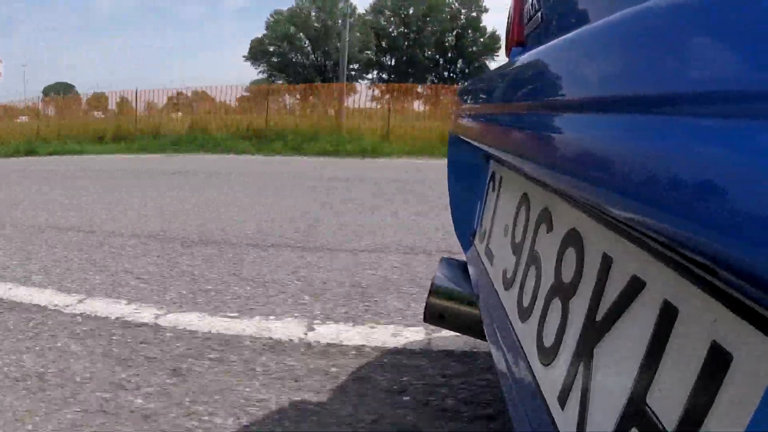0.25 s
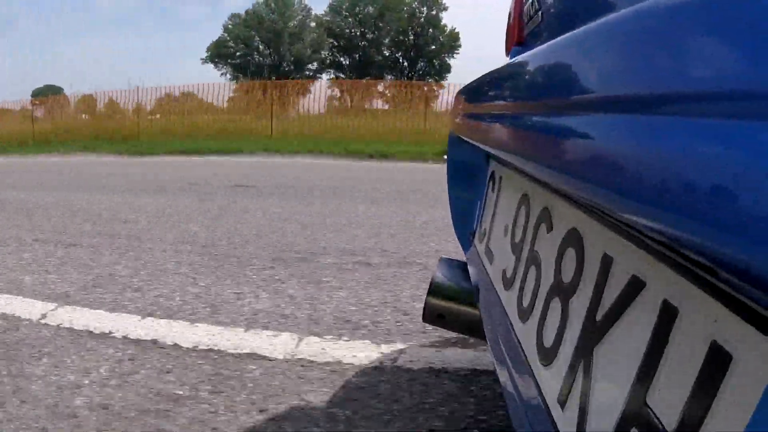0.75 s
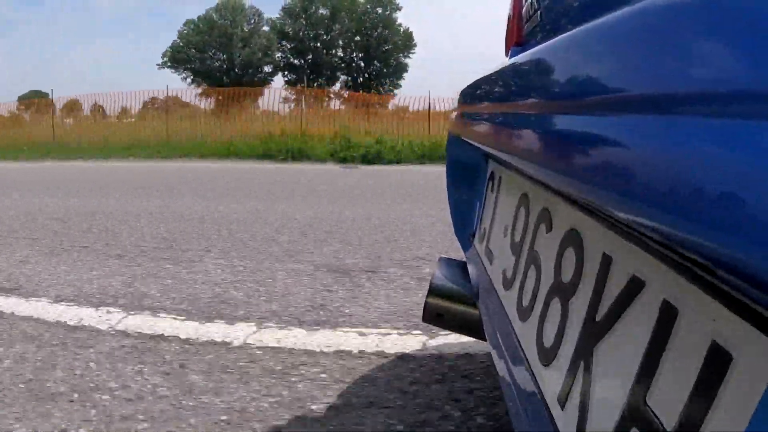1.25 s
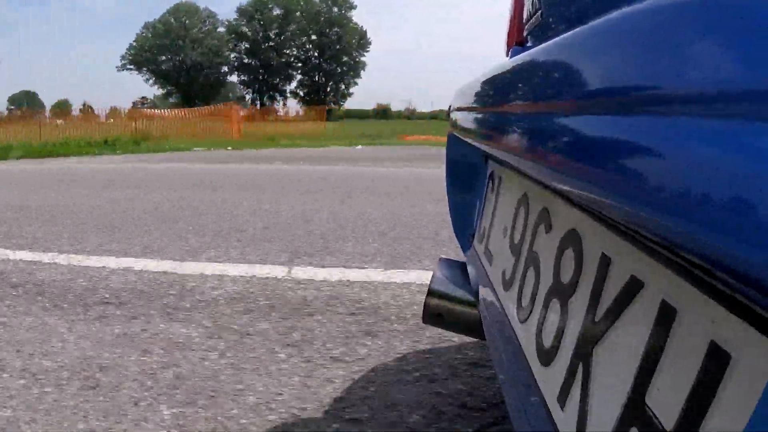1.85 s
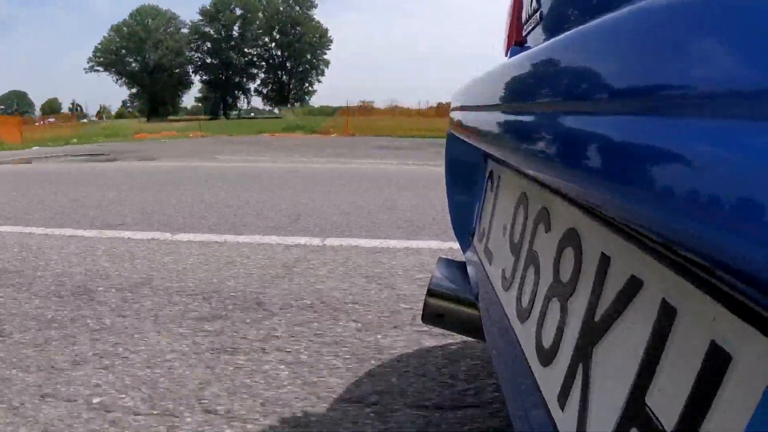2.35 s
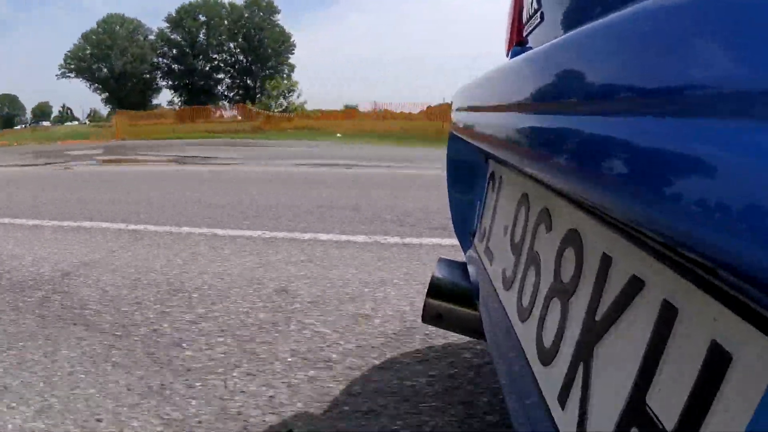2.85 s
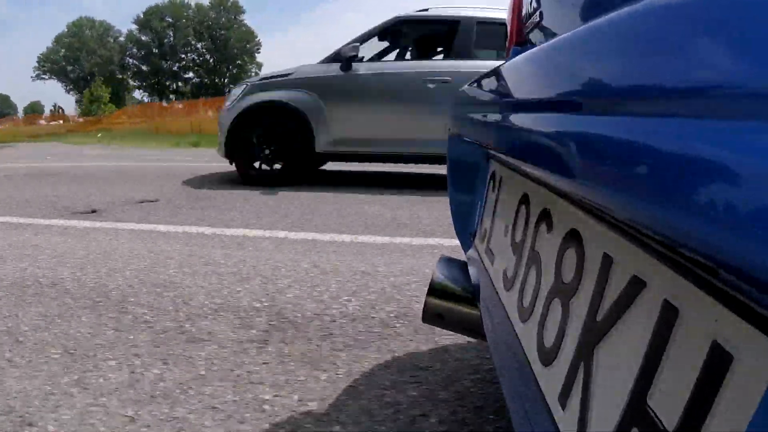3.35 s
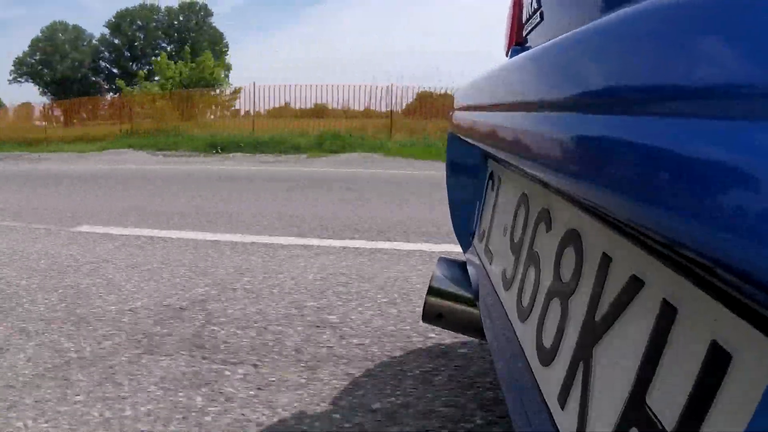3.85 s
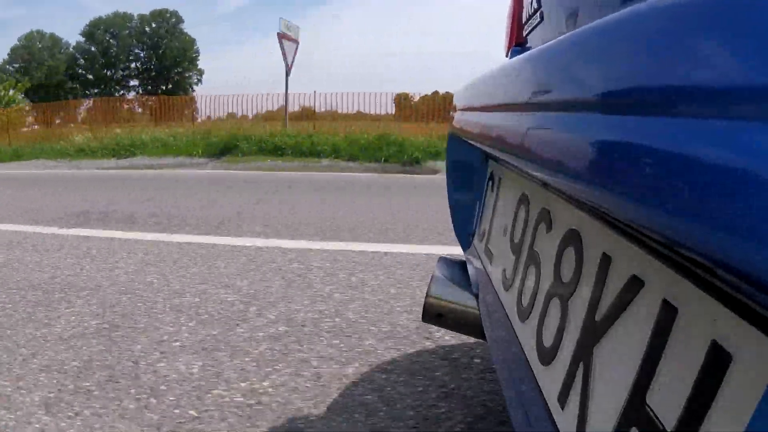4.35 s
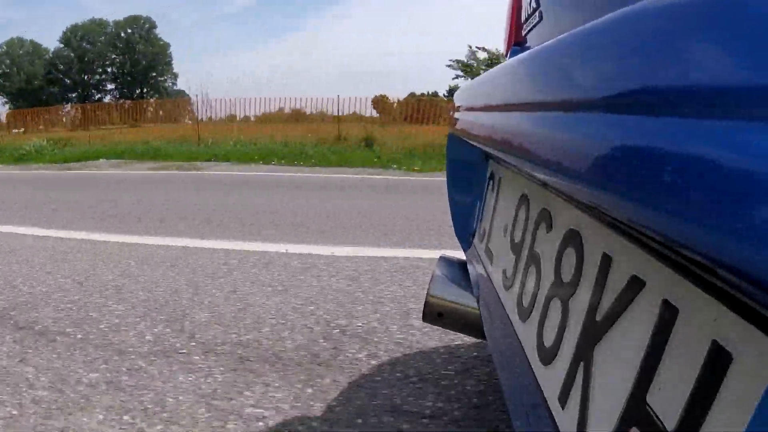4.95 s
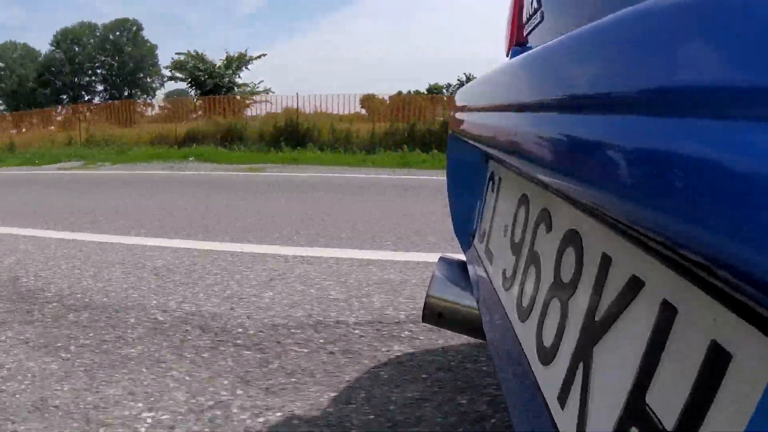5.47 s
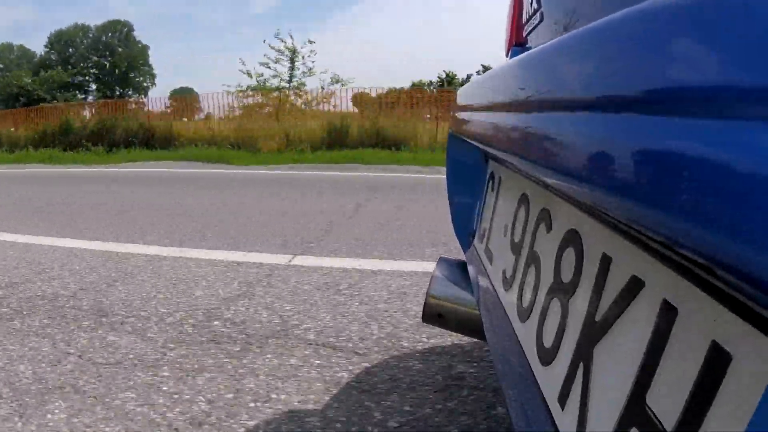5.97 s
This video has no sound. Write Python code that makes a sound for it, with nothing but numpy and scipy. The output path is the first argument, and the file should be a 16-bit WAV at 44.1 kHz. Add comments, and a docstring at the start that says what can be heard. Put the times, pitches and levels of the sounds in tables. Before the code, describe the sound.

Right beside a moving car's tailpipe outdoors, the exhaust barks and rises slightly under load, then the throttle lifts and a tiny metallic clink sounds. A deep overrun drone swells, broken by dense sharp bangs and crackles in two volleys. A few small throttle blips and muffled thuds follow, then a steady drone slowly falls in pitch. Tyres roar and wind buffets the dull, housed microphone.

```python
"""Beside the tailpipe of a four-cylinder car that pulls, lifts off and coasts.
The exhaust drones on low orders of the engine cycle (sines) and barks under load (a shock per firing).
Unburnt fuel bangs in the pipe on lift-off: shocks, ringing noise, thumps and cracks. A metal part clinks once.
Tyres roar and wind buffets the microphone (coloured noise).
The level of engine, tyres and wind is turned down abruptly among the bangs and creeps back."""
import sys
import numpy as np
from scipy import signal
from scipy.fft import rfft, irfft
from scipy.io import wavfile
from scipy.ndimage import uniform_filter1d

SR = 44100
rng = np.random.default_rng(int(sys.argv[2]) if len(sys.argv) > 2 else 0)


def makeup_ratio(level_db):
    """Linear amplitude ratio for a level in decibels (20 dB per factor of ten)."""
    decades = np.asarray(level_db, float) / 20
    return 10 ** decades


def bounce(signal):
    """Save signal as a 16-bit WAV file at the path given by the first command-line argument."""
    frames = np.transpose(np.atleast_2d(signal))
    limited = np.clip(frames, -1, 1)
    pcm = np.round(limited * 32767).astype(np.int16)
    wavfile.write(sys.argv[1], SR, pcm)


N = 273861


def rms_one(x):
    """Scale to rms 1."""
    return x / np.sqrt(np.mean(x ** 2) + 1e-20)


def in_time(rows):
    """Columns of a curve table, interpolated at every sample."""
    s, *columns = np.transpose(rows)
    return [np.interp(np.arange(N) / SR, s, c) for c in columns]


def drift(rate_hz):
    """Random wander of rms 1: noise through two equal one-pole low-passes."""
    r = np.exp(-2 * np.pi * rate_hz / SR)
    noise = rng.standard_normal(N + SR)
    return rms_one(signal.lfilter([1], [1, -2 * r, r * r], noise)[SR:])


def cut(x, hz, kind, order=2):
    """Butterworth high- or low-pass."""
    return signal.sosfilt(signal.butter(order, hz, kind, fs=SR, output="sos"), x)


def resonance(x, hz, width_hz):
    """Two-pole band-pass with gain 1 on top."""
    r = np.exp(-np.pi * width_hz / SR)
    zeros = np.array([1, 0, -1]) * (1 - r * r) / 2
    poles = [1, -2 * r * np.cos(2 * np.pi * hz / SR), r * r]
    return signal.lfilter(zeros, poles, x + 1e-18)


def fade(clicks, t60_s):
    """Each click starts an envelope that falls 60 dB in t60_s."""
    return signal.lfilter([1], [1, -makeup_ratio(-60 / (t60_s * SR))], clicks + 1e-18)


def coloured(spectrum):
    """Noise with the given spectrum; rms 1."""
    hz, db = np.transpose(spectrum)
    bins = np.fft.rfftfreq(N, 1 / SR) + 1
    shape_db = np.interp(np.log(bins), np.log(hz), db, left=-90, right=-140)
    return rms_one(irfft(rfft(rng.standard_normal(N)) * makeup_ratio(shape_db), N))


# Engine speed. Each row: time in seconds, four-stroke cycles per second.
ENGINE_SPEED = [(0, 36), (.2, 37.45), (.5, 39.5), (.64, 40.25), (.74, 40.3), (.82, 39.75), (.92, 40.2),
                (1.05, 40.7), (1.17, 40.5), (1.3, 39.9), (1.45, 40.2), (1.6, 39.8), (2.45, 38), (3.7, 36),
                (3.9, 36.3), (4.05, 35.8), (4.65, 35.05), (4.9, 34.5), (5.5, 32.65), (5.8, 31.6),
                (6.21, 30.5)]


def engine_speed():
    """Four-stroke cycles per second at every sample."""
    return in_time(ENGINE_SPEED)[0]


# Throttle openings. Each row: opens in seconds, shuts in seconds, bark level in dB, fall in dB per second.
THROTTLE_OPENINGS = [(-.1, 0.714, -19.5, 38.5), (.9, 1.219, -33.5, 400), (3.413, 3.532, -34.5, 607),
                     (3.58, 3.615, -33.5, 1503), (3.653, 3.671, -32.5, 797), (3.828, 4.098, -31, 909)]
OPENS_DB_PER_S = 1507


def throttle():
    """Bark level in dB: quick rise, hold, steady fall for each opening; the loudest counts."""
    t = np.arange(N) / SR
    openings_db = []
    for opens_s, shuts_s, level_db, fall_db_per_s in THROTTLE_OPENINGS:
        rise_db = OPENS_DB_PER_S * np.maximum(opens_s - t, 0)
        fall_db = fall_db_per_s * np.maximum(t - shuts_s, 0)
        openings_db.append(level_db - rise_db - fall_db)
    return np.max(openings_db, axis=0)


# Overrun pumping. Each row: time in seconds, level in dB, unevenness of the firings 0-1 (limited to 0.95).
OVERRUN_CURVE = [(0, -35, 0.16), (.7, -40, 0), (1.2, -36, 0.2), (1.25, -2.5, 0.3), (1.45, -0.5, .2),
                 (1.68, 0, 0.1), (1.76, -1.5, 0.8), (2.26, -1.5, 0.8), (2.38, -0.5, .3),
                 (2.565, -0.5, 0.08), (2.575, -6, .5), (2.7, -4.5, 0.4), (2.85, -3, 1), (3.3, -4, .9),
                 (3.56, -11, 0.9), (3.75, -6, 0.7), (3.83, -9, 0.2), (4.09, -7.5, 0.2), (4.15, -9.5, 0.7),
                 (4.35, -10, 0.4), (4.5, -6, .6), (4.62, -2, 0.01), (5.1, -2, .05), (6.21, -1, 0.2)]


def overrun():
    """Overrun level, common to every order, and unevenness of the firings."""
    overrun_db, uneven = in_time(OVERRUN_CURVE)
    return overrun_db, np.clip(uneven, 0, .95)


# What the silencer lets through on the overrun. Each row: frequency in Hz, level in dB.
SILENCER_RESPONSE = [(30, -40), (70, -49), (92, -19), (105, -17), (120, -12.5), (130, -10.5), (145, -16),
                     (160, -14.5), (175, -18), (195, -43), (215, -32.5), (240, -25), (262, -34), (320, -32),
                     (350, -36.5), (400, -45), (440, -42.5)]
# Drone orders, also played by drone(). Each row: order of the engine cycle, phase in degrees,
# level in dB rms at full bark, share of the bark's fall that it follows, overrun level in dB re silencer.
DRONE_ORDERS = [(1, -5, -37.5, .75, 2), (2, -3.5, -44, .75, -5.5), (3, -135, -25, 1, -2),
                (4, -8.5, -10.5, 0.91, 1.5), (5, -32, -28, 0.53, -2), (6, -110, -37, 0.1, 1),
                (7, 164.5, -27.5, .7, -4), (8, -86, -17, 0.56, -4.5), (9, 6.5, -32, 0.9, -2),
                (10, 54, -45, 0.67, 3), (11, 10.5, -45.5, 0.28, -11), (14, 2.5, -54, .75, 0.5)]
FULL_BARK_DB, LIT_DB = -18, -39
RAGGED_DB = 12   # ragged firing builds no tone


def order_levels(speed, bark_db, overrun_db, uneven):
    """Level of each drone order: fired share plus pumped share, as powers."""
    hz, passed_db = np.transpose(SILENCER_RESPONSE)
    out_db = 3.0 * np.minimum(bark_db - LIT_DB, 0) - RAGGED_DB * uneven ** 2   # below LIT_DB the fire is out
    levels = []
    for order, _, full_db, share, pumped_db in DRONE_ORDERS:
        pumped = makeup_ratio(overrun_db + pumped_db + np.interp(order * speed, hz, passed_db))
        fired = makeup_ratio(full_db + share * (bark_db - FULL_BARK_DB) + out_db)
        levels.append(np.hypot(pumped, fired))
    return levels


def drone(cycles, levels, uneven):
    """Low orders of the engine cycle; uneven firings smear each line into a wavering band."""
    wavers = [drift(32.0) for k in range(4)]
    out = np.zeros(N)
    for i, (row, level) in enumerate(zip(DRONE_ORDERS, levels)):
        angle = 2 * np.pi * row[0] * cycles + np.radians(row[1])
        in_phase = np.sqrt(2 * (1 - uneven ** 2)) + uneven * wavers[i % 4]
        quadrature = uneven * wavers[(i + 1) % 4]
        out += level * (in_phase * np.cos(angle) + quadrature * np.sin(angle))
    return out


# Tailpipe and bodywork resonances. Each row: frequency in Hz, width in Hz, gain in dB.
PIPE_MODES = [(316, 120, -20), (644, 150, -0.5), (1070, 147, 4.5), (1122, 246, -1), (1880, 440, -7),
              (2920, 530, -31.5), (6040, 850, -33)]


def pipe(x):
    """Resonances in parallel, signs alternating."""
    out = np.zeros(N)
    for k, (hz, width_hz, gain_db) in enumerate(PIPE_MODES):
        out += (-1) ** k * makeup_ratio(gain_db) * resonance(x, hz, width_hz)
    return out


def shock(clicks, top_hz):
    """Steep pressure front, quick decay, repeated duller by the tip of the pipe."""
    tip_echo_s, tip_echo_db = .00103, -5.5   # round trip
    lag = round(tip_echo_s * SR)
    front = cut(cut(fade(clicks, .0055), top_hz, "low", order=3), 200, "high", order=1)
    echo = makeup_ratio(tip_echo_db) * np.array([1, 2, 3, 2, 1]) / 9
    return signal.lfilter([1], np.r_[1, np.zeros(lag - 3), -echo], front)


# Uneven filling of the four cylinders, heard most at light throttle.
# Each entry: relative level, times 4.47 dB at light throttle and 3.47 dB under load.
CYLINDER_FILLING = [-1, -0.5, -1.5, -0.5]
LONG_RUNNER_S = 0.00032   # two of the four cylinders have a longer way to the pipe


def bark(cycles, bark_db, uneven):
    """A small shock per firing and a puff of hiss behind it; the low orders belong to the drone."""
    load = np.clip((bark_db + 36) / 15, 0, 1)   # light throttle gives rounder, less even pulses
    fired = np.flatnonzero(np.diff(np.floor(4 * cycles + 0.055))) + 1
    cylinder = np.arange(len(fired)) % 4
    late = np.round((cylinder >= 2) * LONG_RUNNER_S * SR).astype(int)
    at = np.minimum(fired + late, N - 1)
    scatter_db = rng.standard_normal(len(at)) * (.4 + 4 * uneven[at])
    filling_db = np.array(CYLINDER_FILLING)[cylinder] * (4.47 - load[at])
    pulses = np.zeros(N)
    pulses[at] = makeup_ratio(scatter_db + filling_db)

    front = shock(pulses, 1900.0)
    mellow = makeup_ratio(6.5) * resonance(front, 1008.0, 460.0)
    mellow += makeup_ratio(7.0) * resonance(front, 690.0, 100.0)
    mellow += makeup_ratio(2.5) * resonance(front, 470.0, 90.0)
    sharp = front + makeup_ratio(-6.5) * resonance(front, 1700.0, 500.0)
    sharp += makeup_ratio(5.5) * resonance(front, 2200.0, 990.0)
    sharp += makeup_ratio(8.0) * resonance(front, 2370.0, 120.0)
    sharp += makeup_ratio(4.0) * resonance(front, 3050.0, 350.0)

    puffs = fade(pulses ** 3, 0.019) * rng.standard_normal(N)
    whistle = resonance(resonance(puffs, 6060.0, 1300.0), 6060.0, 1300.0)
    hiss = makeup_ratio(-12.0) * whistle
    hiss += makeup_ratio(-30.5) * cut(puffs, 9500.0, "high")
    hiss += makeup_ratio(-17.0) * resonance(puffs, 3850.0, 500.0)
    hiss += makeup_ratio(-14) * pipe(puffs)

    mixed = cut(mellow + load * (sharp + hiss), 390.0, "high")
    return makeup_ratio(bark_db) * mixed / np.std(cut(mellow + sharp, 270.0, "high"))


def chuff(cycles, speed, overrun_db):
    """On the overrun one cylinder spits a dull pulse once a cycle, fainter as the engine slows."""
    level_db, scatter_db, db_per_speed, reference_speed = -18.5, 3, 2.5, 40   # re overrun; speeds in cycles/s
    at = np.flatnonzero(np.diff(np.floor(cycles + .2))) + 1
    pulse_db = overrun_db[at] + level_db + db_per_speed * (speed[at] - reference_speed)
    pulses = np.zeros(N)
    pulses[at] = makeup_ratio(pulse_db + scatter_db * rng.standard_normal(len(at)))
    return cut(shock(pulses, 1200.0), 380.0, "high")


# Muffled afterburns. Each row: time in seconds, relative level in dB.
MUFFLED_BURNS = [(3.673, -12.5), (4.124, -11.5), (4.238, -24.5), (4.322, -23.5), (4.404, -10.5),
                 (4.437, -9), (4.464, -11.5), (4.489, -7.5)]
# Bangs, also read by falter().
# Each row: time in seconds, relative level in dB, thump in dB re level, crack in dB re level.
PIPE_BANGS = [(1.6707, -27.5, -6, -14), (1.7201, -3, 0.5, -19), (1.7284, -3, -6.5, -25),
              (1.7497, -21.5, 3.5, -15.5), (1.812, -8.5, 8, -20), (1.8824, -1, -24.5, -19),
              (1.895, -15.5, 13.5, -54.5), (1.899, -9, -10.5, -17), (1.9678, -13.5, 4, -17),
              (2.051, -14, -1, -28), (2.0533, 0, 0.5, -19.5), (2.0586, -7, 1, -32.5),
              (2.1471, -3, -10.5, -21), (2.2185, -2.5, -2.5, -20), (2.235, -6.5, -3.5, -19),
              (2.2566, -16, 9.5, -16.5), (2.625, -2.5, -11, -14.5), (2.6311, -5.5, -30.5, -20.5),
              (2.7076, -23.5, 2, -23), (2.772, -25, 4, -18), (2.8048, -11.5, -20, -21.5),
              (2.8706, -11, -6, -19), (2.891, -20, -14, -23.5), (2.9051, -14, -5, -30),
              (2.9652, -11, -5.5, -20), (3.032, -8.5, -4.5, -22), (3.035, -26, 10, -34.5),
              (3.0372, -18.5, 9.5, -20), (3.106, -25.5, -17, -21.5), (3.1123, -9, -2, -26),
              (3.1277, -6, -19.5, -20), (3.1983, -17, 6, -21), (3.239, -36, -12, -13),
              (3.2913, -12, 1, -15), (3.2927, 3, -13, -22.5), (3.3694, -20, -6, -26),
              (3.768, -7, 3.5, -21.5)]


def bangs():
    """A shock with its echoes, turbulence ringing the pipe, a low thump and a bright crack."""
    s, level_db, thump_db, crack_db = np.transpose(PIPE_BANGS)
    at = np.round(s * SR).astype(int)
    body, thump, crack, muffled = np.zeros((4, N))
    body[at] = makeup_ratio(level_db)
    thump[at] = makeup_ratio(level_db + thump_db)
    crack[at] = makeup_ratio(level_db + crack_db)
    for burn_s, burn_db in MUFFLED_BURNS:
        muffled[round(burn_s * SR)] = makeup_ratio(burn_db)
    noise = rng.standard_normal((3, N))

    burst = makeup_ratio(-18.5) * body
    burst += makeup_ratio(5.0) * fade(body, 0.032) * noise[0]
    burst += makeup_ratio(-15.0) * fade(body, 0.075) * noise[1]
    low = makeup_ratio(34.0) * cut(resonance(thump, 290.0, 140.0), 420.0, "low", order=3)
    soft = makeup_ratio(42.5) * resonance(resonance(muffled, 160.0, 120.0), 160.0, 120.0)   # burnt far up the pipe

    crackle = makeup_ratio(8.5) * fade(crack, .016) + makeup_ratio(-13.5) * fade(crack, 0.076)
    snap = makeup_ratio(21.0) * crack + crackle * noise[2]
    bright = makeup_ratio(-7.5) * cut(snap, 6100.0, "high") + resonance(snap, 6320.0, 990.0)

    tail = fade(body, 0.27) * noise[1]   # hiss and a faint ring of the pipe wall linger
    after = makeup_ratio(-42.5) * resonance(tail, 3000.0, 2500.0) + makeup_ratio(-40.0) * resonance(tail, 3750.0, 52.0)
    return makeup_ratio(5.0) * shock(body, 1800.0) + pipe(burst) + low + bright + soft + after


EDGE_SAMPLES = round(.004 * SR)   # smooths the onset of falters and dips


def falter():
    """The pumped drone falters briefly after each bang, the more the louder it is (dB)."""
    depth_db, time_constant_s = 3.5, 0.058   # depth behind a bang of 0 dB
    s, level_db = np.transpose(PIPE_BANGS)[:2]
    kicks = np.zeros(N)
    kicks[np.round(s * SR).astype(int)] = makeup_ratio(level_db)
    faltering = fade(kicks, time_constant_s * np.log(1000))
    return -depth_db * uniform_filter1d(faltering, size=EDGE_SAMPLES)


# Modes of a small metal part. Each row: frequency in Hz, relative level in dB, t60 in seconds.
CLINK_MODES = [(4086, -2, .55), (4942, 0, .55), (5496, -6, .35), (6778, -6, .2), (8400, -16, .15),
               (8893, -6, .2), (9367, -12, .15)]


def clink():
    """A part is struck once: a short tick and decaying modes."""
    struck_s, level_db = .848, -47
    t = np.maximum(np.arange(N) / SR - struck_s, 0)
    noise = cut(rng.standard_normal(N), 5000.0, "high")
    out = makeup_ratio(level_db + 17.0 - 60 * t / .03) * (t > 0) * noise
    for hz, mode_db, t60_s in CLINK_MODES:
        out += makeup_ratio(level_db + mode_db - 60 * t / t60_s) * np.sin(2 * np.pi * hz * t)
    return out


# Abrupt cuts in the level at which engine and road are heard, as from a limiter.
# Each row: time in seconds, depth in dB, return time constant in seconds.
LEVEL_DIPS = [(1.672, 5, 1), (2.059, 6.5, 0.14), (2.568, 20.5, 0.41), (3.245, 6.5, 0.061)]


def dips():
    """Gain in dB that drops quickly at the listed times and returns exponentially."""
    t = np.arange(N) / SR
    db = np.zeros(N)
    for s, depth_db, back_s in LEVEL_DIPS:
        db -= depth_db * (t > s) * np.exp(-np.maximum(t - s, 0) / back_s)
    return uniform_filter1d(db, size=EDGE_SAMPLES)


# Background levels. Each row: time in seconds, tyre roar in dB, wind in dB.
ROAD_LEVELS = [(0, -28, -47), (.5, -30, -32.5), (1.17, -33.5, -29.5), (1.75, -29.5, -21), (2.5, -34, -25.5),
               (3.0, -35, -31), (3.45, -38.5, -26.5), (3.95, -34.5, -34), (4.21, -34, -29),
               (5.05, -32.5, -26.5), (6.21, -32.5, -28)]
# Tyre roar spectrum. Each row: frequency in Hz, relative density in dB per Hz.
ROAR_SPECTRUM = [(250, -0.5), (380, -11.5), (520, -16.5), (700, -14.5), (930, -16.5), (1210, -15),
                 (1350, -21.5), (2400, -31.5), (4560, -47), (6400, -47), (7900, -58), (10300, -70),
                 (13000, -86.5)]
# Wind spectrum. Each row: frequency in Hz, relative density in dB per Hz.
WIND_SPECTRUM = [(15, -22), (30, -5), (48, 0), (75, -7), (150, -13), (300, -24), (450, -45), (900, -80)]
WIND_DIP_SHARE = 0.9


def road(dip_db):
    """Tyre roar, slightly patchy, and lumpy wind noise."""
    roar_db, wind_db = in_time(ROAD_LEVELS)
    roar = makeup_ratio(roar_db + dip_db + 1.1 * drift(21.0)) * coloured(ROAR_SPECTRUM)
    wind = makeup_ratio(wind_db + WIND_DIP_SHARE * dip_db + 0.72 * drift(3.1)) * coloured(WIND_SPECTRUM)
    return roar + wind


def scene():
    """Exhaust, bangs, clink and road at one microphone."""
    speed, bark_db, dip_db = engine_speed(), throttle(), dips()
    cycles = np.cumsum(speed) / SR
    overrun_db, uneven = overrun()
    levels = order_levels(speed, bark_db, overrun_db + falter(), uneven)
    engine = drone(cycles, levels, uneven)
    engine += bark(cycles, np.maximum(bark_db, -60), uneven)
    engine += chuff(cycles, speed, overrun_db)
    return (makeup_ratio(dip_db) * engine + bangs() + clink() + road(dip_db))[None]


def band_limit(x):
    """A steep low-pass at the top of the band."""
    return signal.sosfilt(signal.butter(12, 15000, fs=SR, output="sos"), x)


def record(dry):
    """The housed microphone is dull on top and rounds the highest peaks."""
    dull = cut(cut(dry, 7800, "low", order=4), 22, "high")
    rounded = 1.1 * np.tanh(dull / 1.1)
    return band_limit(rounded)


dry = scene()
out = record(dry)
bounce(out)
```